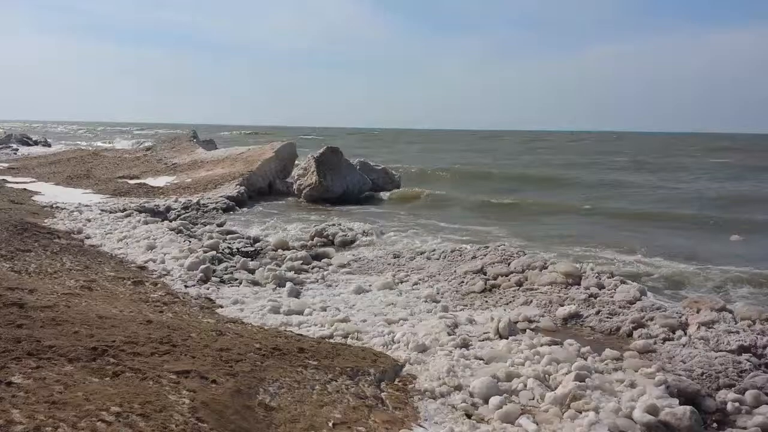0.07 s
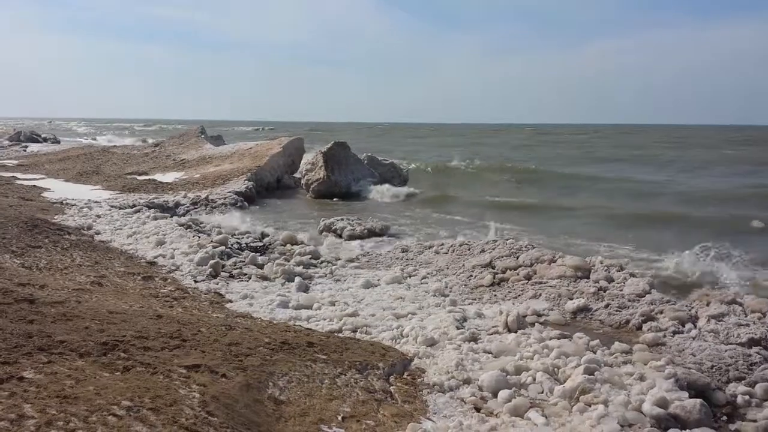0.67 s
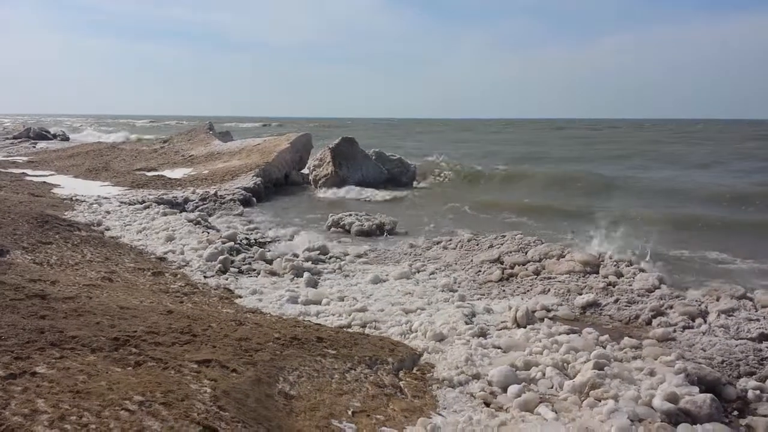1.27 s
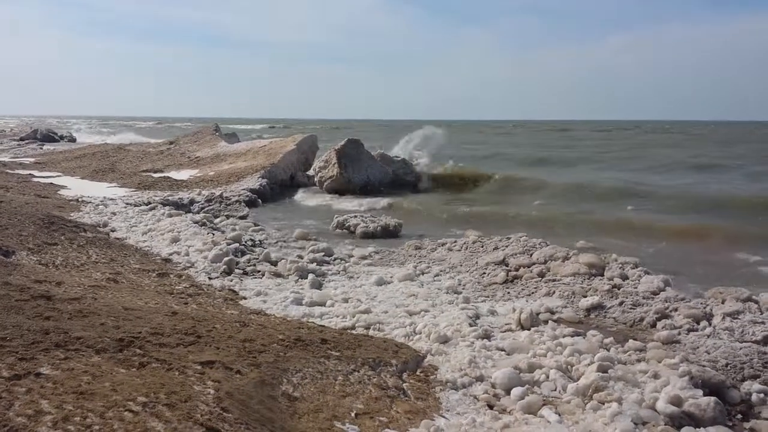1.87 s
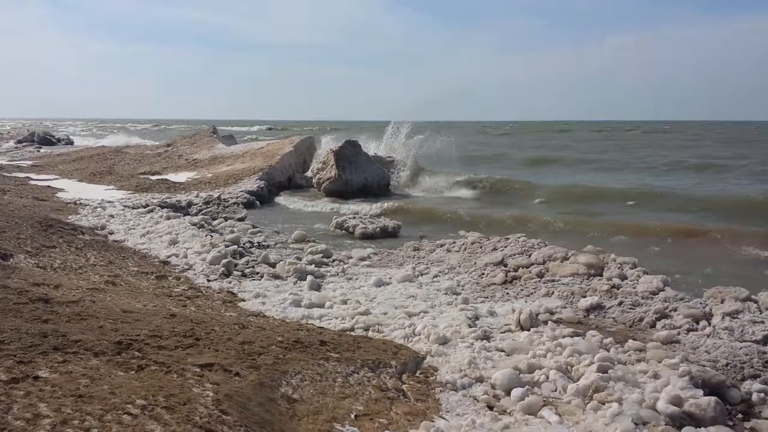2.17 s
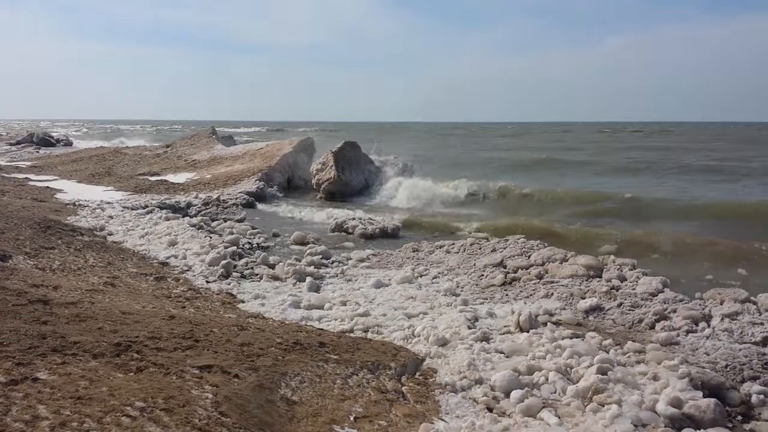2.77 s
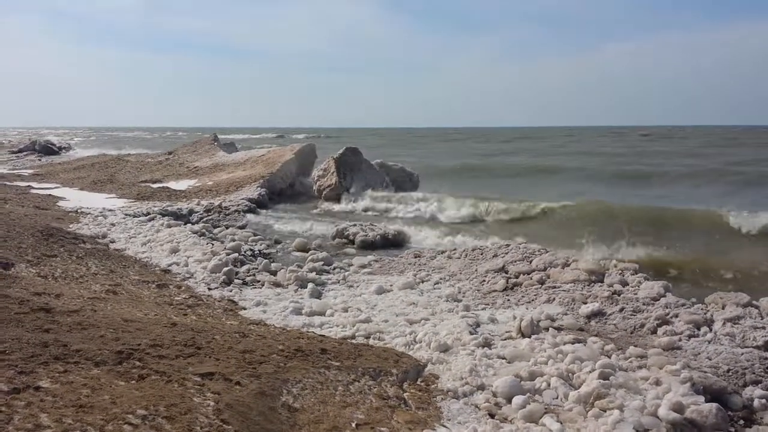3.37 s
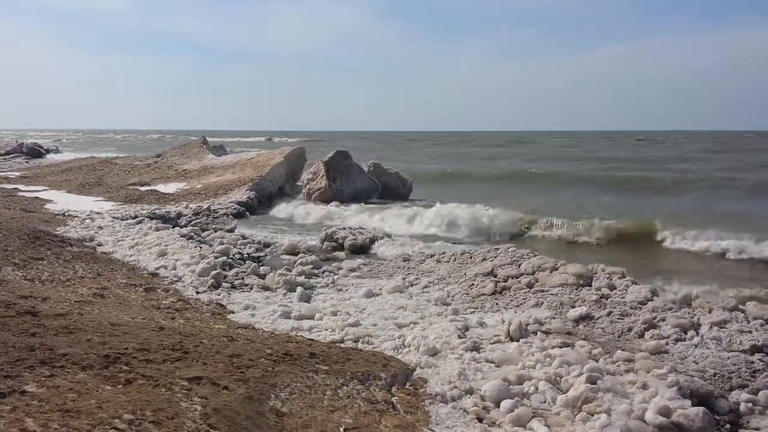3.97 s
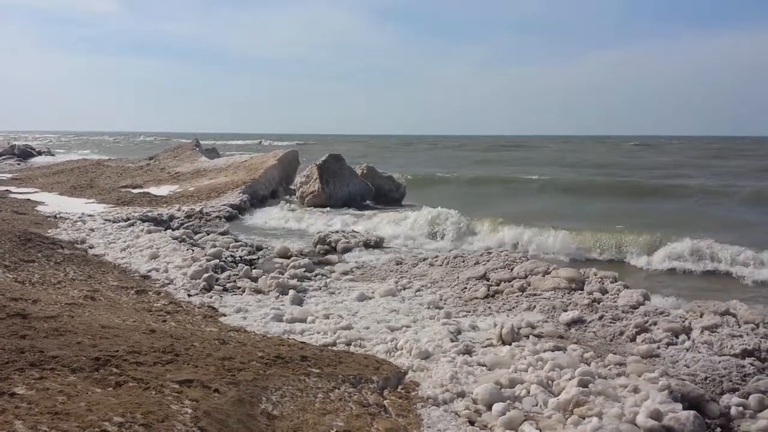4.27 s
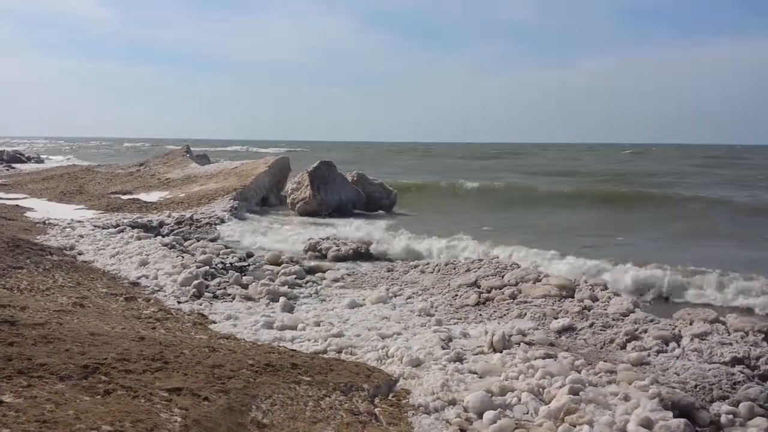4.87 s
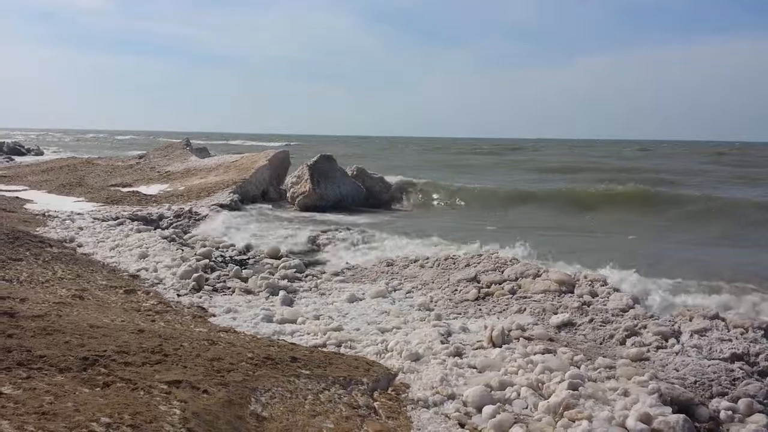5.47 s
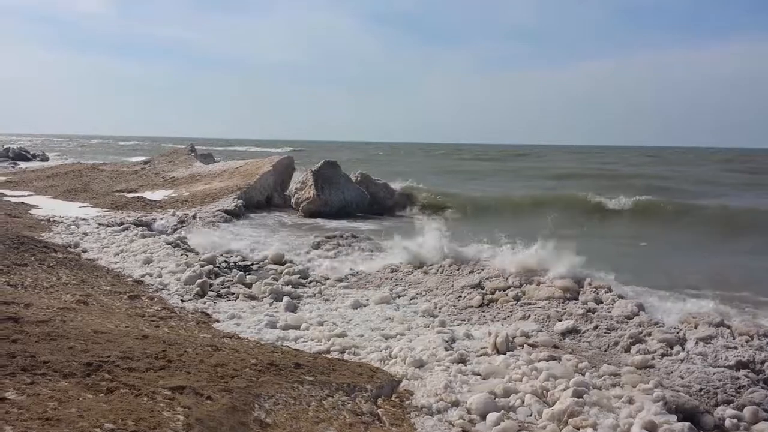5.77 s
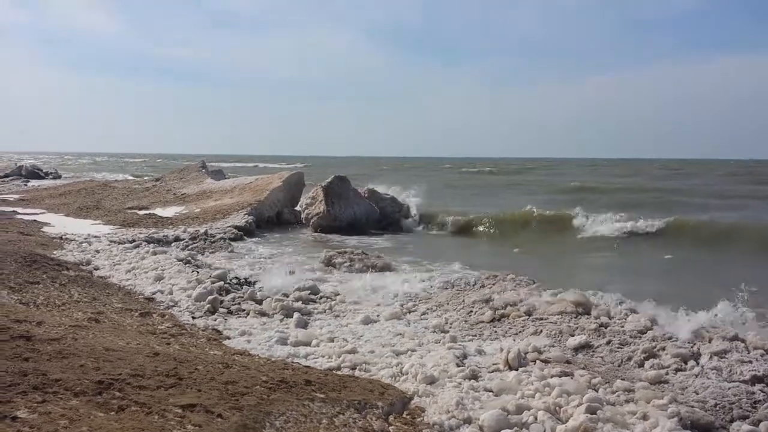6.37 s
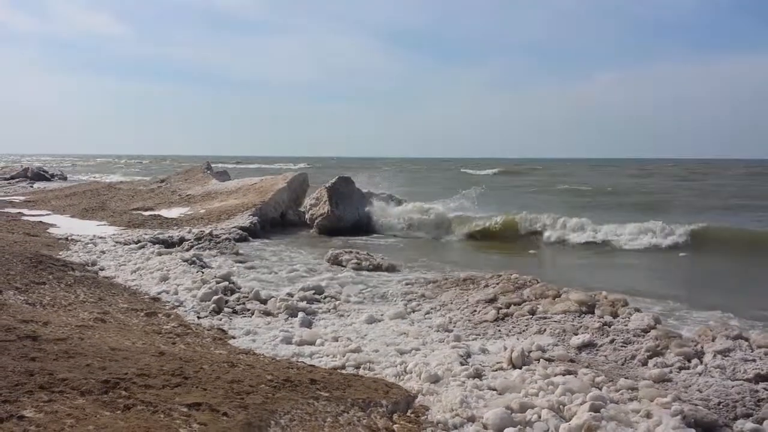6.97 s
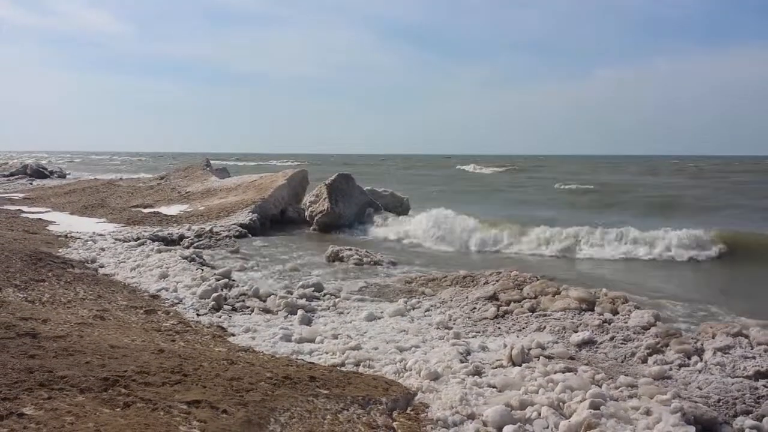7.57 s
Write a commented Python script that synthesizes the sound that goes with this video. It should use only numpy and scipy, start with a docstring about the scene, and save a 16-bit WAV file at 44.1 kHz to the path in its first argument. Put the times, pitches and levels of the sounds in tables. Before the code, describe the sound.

Outdoors by a lake, close wind rumbles unevenly against the microphone, breaking into short, rough gusts with crackles and thuds. Behind it, waves hiss softly on the icy shore, now and then splashing and dropping a fine spray. During a short lull, water gurgles between the ice lumps, before the wind picks up again and keeps buffeting to the end.

```python
"""Gusts on an icy lake shore

Wind buffets a camera's two microphone ports, each with its own rumble. Strong gusts tear into
short, brighter eddies, and some slap a port with a crack. Farther off, waves break, fizz and
gurgle over lumps of ice; gain control ducks them under the hardest gusts."""
import sys
import numpy as np
from scipy import signal
from scipy.fft import rfft, irfft
from scipy.io import wavfile
from scipy.ndimage import uniform_filter1d, minimum_filter1d

SR = 44100
rng = np.random.default_rng(int(sys.argv[2]) if len(sys.argv) > 2 else 0)


def output_pcm(signal):
    """Save a mono or channel-first signal as 16-bit PCM at the path in sys.argv[1].

    Samples are clipped to [-1, 1] before scaling.
    """
    pcm = np.clip(np.atleast_2d(signal).T, -1, 1) * 32767
    wavfile.write(sys.argv[1], SR, np.round(pcm).astype(np.int16))


N = 336483
TIME = np.arange(N) / SR
HZ = np.fft.rfftfreq(N, 1 / SR)

# Steady breeze on the left port: time_s, rumble_db
LEFT_BREEZE = [(0.4, -18), (1.7, -19.5), (2.15, -23.5), (2.6, -20.5), (3.6, -20.5), (3.92, -31),
               (4.5, -26.5), (4.75, -35.5), (5.05, -32.5), (5.4, -30.5), (6.75, -28), (7.6, -36)]
# Gusts that catch the left port: start_s, length_s, rumble_db, eddies_over_rumble_db
LEFT_GUSTS = [(0.386, 0.074, -21, 4.5), (0.636, 0.05, -20, -2), (0.77, 0.089, -14, -6.5),
              (0.94, 0.067, -14, -11), (1.16, 0.19, -20, -4.5), (1.376, 0.16, -15.5, -3.5),
              (1.555, 0.11, -21, 0.5), (1.753, 0.32, -17.5, -3.5), (2.176, 0.033, -12.5, -14),
              (2.276, 0.17, -15, -3.5), (2.435, 0.054, -14, 0), (2.49, 0.1, -20.5, 8),
              (2.611, 0.077, -11.5, -7.5), (2.727, 0.087, -19, 0.5), (2.931, 0.16, -10.5, -5.5),
              (3.122, 0.1, -14.5, 0.5), (3.276, 0.26, -23.5, 7.5), (3.578, 0.085, -23, 5.5),
              (3.679, 0.15, -17.5, 0.5), (3.94, 0.11, -22, -2.5), (4.041, 0.15, -17, 1.5),
              (4.214, 0.11, -20, -3.5), (4.417, 0.068, -16, -5), (5.087, 0.022, -13, -11),
              (5.132, 0.097, -27, 4), (5.248, 0.09, -19.5, 1.5), (5.45, 0.025, -27, -4),
              (5.528, 0.11, -16, -4), (5.679, 0.11, -11.5, -9), (5.794, 0.11, -16.5, -6),
              (5.995, 0.018, -13, -4.5), (6.028, 0.062, -14.5, -3), (6.11, 0.038, -23.5, 2),
              (6.235, 0.16, -19.5, -4), (6.421, 0.037, -14, -4), (6.488, 0.059, -15, -19),
              (6.574, 0.084, -21.5, -5), (6.824, 0.15, -17.5, -1), (6.977, 0.15, -16.5, 1),
              (7.181, 0.08, -12, -3.5), (7.302, 0.1, -21, 3.5), (7.413, 0.13, -16.5, -0.5),
              (7.543, 0.04, -17, 1.5)]
# Smoother flow on the right port: time_s, rumble_db, eddies_over_rumble_db
RIGHT_FLOW = [(0.4, -17, -8), (0.67, -22.5, 0), (0.78, -20, -9), (0.95, -21, -4), (1.3, -14.5, -6.5),
              (1.49, -13, -5), (1.56, -18.5, -4), (1.72, -17, -5), (1.9, -22, -6), (2.2, -25.5, -8),
              (2.48, -21, -6), (2.63, -14, -5), (2.83, -27.5, -5), (2.95, -21, -3), (3.13, -21.5, -13),
              (3.23, -16, 2.5), (3.34, -19, -1), (3.5, -21.5, 6), (3.9, -19, 0), (4.1, -21.5, 0.5),
              (4.3, -22, -2), (4.53, -21.5, -3), (4.62, -21.5, -0.5), (4.68, -19.5, -3), (4.77, -20.5, -1),
              (4.86, -20.5, -1), (5.02, -24.5, -7), (5.1, -25, -2), (5.19, -22.5, 0), (5.3, -24, -1.5),
              (5.5, -24.5, -3.5), (6.1, -25, -5), (6.36, -25, -2.5), (6.52, -29.5, 2.5), (6.78, -23, -6.5),
              (6.9, -18.5, 2.5), (7.08, -17, 1), (7.19, -14.5, 3), (7.28, -16.5, -1), (7.43, -17, 1.5),
              (7.6, -18, 0.5)]
# Tone of the wind right on the microphone: frequency_hz, gain_db
RUMBLE_SPECTRUM = [(15, -38), (30, -32), (55, -8.5), (120, -0.5), (200, -4), (300, -10.5), (450, -22),
                   (900, -35.5), (2000, -77)]
EDDY_SPECTRUM = [(40, -42), (130, 0), (280, 3), (450, -1), (700, -6.5), (1100, -14), (1600, -22.5),
                 (2400, -31), (3300, -37.5), (6000, -58), (14000, -86)]
# The size of the largest whirls lifts or thins the deepest rumble: time_s, gain_db
RUMBLE_DEPTH = [(.4, -4), (1, -3), (1.4, -8), (2.2, 0), (2.7, -3), (3.1, 2), (3.7, -6), (4.1, 0.5),
                (4.7, -3), (5.1, -4.5), (5.55, 6.5), (5.9, 1.5), (6.45, 5), (6.9, -2.5), (7.35, 0)]
# Level of the surf as heard behind the wind: it swells, and the level dips briefly at times: time_s, fizz_db,
# body_over_fizz_db
SURF_LEVEL = [(.6, -43, 2), (1.4, -44, 3), (2.05, -45.5, 6), (2.4, -42.5, 2), (2.85, -44, 3), (3.08, -41, 0.5),
              (3.35, -44, 5.5), (3.6, -44.5, 6.5), (3.95, -43, 2), (4.4, -42, 2.5), (4.62, -41.5, 3),
              (4.88, -41.5, 3), (5.15, -43, 3), (5.38, -40, 1.5), (5.52, -40.5, 4.5), (5.68, -39, 3),
              (5.82, -43.5, 4), (6.05, -44.5, 5), (6.2, -42.5, 3.5), (6.42, -44.3, 4.5), (6.6, -44, 4),
              (7.1, -42.5, 6), (7.6, -41, 4.5)]
# Bursts of hiss: waves bursting on the ice, and at 3.515 s wind hissing at the right port: start_s, fizz_db,
# left_minus_right_db
HISS_BURSTS = [(1.145, -45.5, 0), (2.345, -40.5, -1), (3.515, -47.5, -13), (4.57, -42, -3), (7.275, -44, 3)]
# Tone of the wash as it reaches each port: frequency_hz, gain_db
LEFT_WASH_SPECTRUM = [(700, 0), (1200, -6), (1700, -6), (2300, -4.5), (2900, -10), (3900, -8.5),
                      (4500, -5.5), (5050, -7.5), (5700, -1), (6400, 0), (7200, -6), (8200, -8.5),
                      (10000, -16), (12000, -17.5), (15000, -22)]
RIGHT_WASH_SPECTRUM = [(150, 6.5), (700, -2.5), (1200, -5), (1700, -4), (2300, -1), (2800, -10.5),
                       (3500, -13), (4450, -11), (5100, -13), (6300, -11.5), (7800, -11), (10000, -19),
                       (12000, -19.5), (15000, -24.5)]
# Foam running close to the microphone has more top treble: time_s, gain_db
FOAM_AIR = [(.6, -2), (2.4, -0.5), (3.3, -4), (4.2, -2.5), (5.4, 0), (6.6, 1), (7.6, 0.5)]
# Eddies striking a port; a short flip cracks, a long one thuds:
# time_s, level_db, left_minus_right_db, flip_s
SLAPS = [(.467, 0.5, 22, 0.000083), (.717, 3, 27, 0.00016), (0.753, -1.5, 20, 0.00016),
         (.779, -4.5, 20, 0.00018), (.802, -4, 20, 0.0002), (.849, 0.5, 25, 0.0002),
         (.878, -2.5, 18, 0.00018), (0.957, -8, 12, 0.00022), (1.214, 0.5, 22, 0.00037),
         (1.29, 3, 16, 0.00033), (1.338, -4.5, 19, 0.00016), (1.383, 3, 19, 0.00044),
         (1.497, -2, 26, 0.00011), (1.546, 4.5, 25, 0.0002), (1.879, -2.5, 20, 0.00027),
         (2.343, -4, 22, 0.00017), (2.449, -5, 22, .00011), (2.465, 0, 27, 0.00013),
         (2.499, 0.5, 23, 0.00014), (2.514, -2, 10, 0.0002), (2.528, 0, 20, 0.00018),
         (2.551, -13, 20, 0.00012), (2.57, 0, 16, 0.0001), (2.654, 0, 18, .0003),
         (2.681, -3.5, 18, 0.00014), (3.003, -2, 24, 0.000083), (3.067, -4, 24, 0.00014),
         (3.147, 0.5, 25, 0.00017), (3.158, -3.5, 22, 0.000087), (3.293, -6, -18, 0.00013),
         (3.311, 1, 26, 0.00016), (3.351, 2.5, 13, 0.00012), (3.425, -5, 18, 0.0001),
         (3.486, -4, -15, 0.00011), (3.574, -7, -21, 0.000099), (3.778, -2, -24, 0.00013),
         (3.792, -4.5, 12, 0.00024), (4.156, -2, 15, .00018), (4.446, -3, 16, .0004),
         (4.62, -8, -20, 0.00023), (4.766, -4, -24, 0.00021), (5.1, -4.5, 26, 0.00019),
         (5.294, -6, 8, 0.00023), (5.596, -9, 23, 0.00027), (5.707, 1, 20, 0.00042),
         (5.751, 0, 21, 0.00038), (5.805, -5, 24, 0.00011), (5.822, -1, 20, 0.00034),
         (6.01, -0.5, 20, 0.00028), (6.038, -6.5, 18, 0.00011), (6.056, -1, 20, 0.00045),
         (6.089, -2, 20, 0.00026), (6.336, -5.5, 16, .0002), (6.438, -2, 16, 0.00018),
         (6.512, -4, 17, 0.00058), (6.549, -5, 16, 0.00021), (6.92, -5, 17, 0.00013),
         (7.171, -2, -7, 0.0001), (7.229, -2, 15, 0.00049), (7.427, 0.5, 5, 0.00035),
         (7.502, -5, 11, .00018)]
# Tone of the rasp after a slap: frequency_hz, gain_db
RASP_SPECTRUM = [(40, -7), (150, 16.5), (500, 16.5), (1000, 3), (1600, -5.5), (2400, -12), (3500, -23),
                 (7000, -23), (14000, -62)]
# Thumps, hollow flutters and rushing notes on the left port: start_s, length_s, pitch_hz, level_db
VORTICES = [(1.41, 0.11, 395, -13.5), (2.43, 0.28, 169, -12.5), (2.444, 0.11, 1050, -21.5),
            (2.824, 0.024, 142, -9.5), (2.945, .15, 75.4, -14.5), (4.038, .16, 81, -13.5),
            (5.992, 0.14, 139, -11.5), (6.965, .13, 344, -19.5)]
# Spray raining back on the ice: start_s, length_s, level_db
SHOWERS = [(1.55, 0.63, -46.5), (2.1, 0.94, -42.5), (2.29, 0.17, -44), (5.786, 0.28, -44), (6.1, 0.13, -42),
           (6.3, .22, -43)]
# Sizzle of that spray: frequency_hz, gain_db
SIZZLE_SPECTRUM = [(1500, -25), (2400, -21), (3200, -27), (5200, -9), (6200, 10), (6800, 3), (8000, -22),
                   (14000, -35)]
# Broken waves running up over the lumps of ice: time_s, level_db, gurgle_hz
SURGE = [(2.6, -62, 2300), (2.83, -44, 2360), (3.1, -60, 2350), (4.1, -56, 2200), (4.62, -45, 2220),
         (5.0, -48, 2220), (5.35, -42.5, 2300), (5.65, -41, 2200), (5.95, -43, 2150), (6.5, -49, 2260),
         (7.0, -56, 2280)]


def from_db(db):
    return 10 ** (np.asarray(db) / 20)


def unit(x):
    """Scales to rms 1."""
    return x / np.sqrt(np.mean(x ** 2) + 1e-20)


def follow(rows):
    """The columns of a timed table at every sample."""
    times, *columns = np.transpose(rows)
    return [np.interp(TIME, times, column) for column in columns]


def colour(x, spectrum):
    """Filters by a spectrum, keeping the power of white noise."""
    hz, db = np.transpose(spectrum)
    gain = from_db(np.interp(np.log(HZ + 1), np.log(hz), db))
    return irfft(rfft(x) * unit(gain), N)


def low_pass(x, hz):
    """Keeps what lies under hz, without delay."""
    return irfft(rfft(x) / (1 + (HZ / hz) ** 4), N)


def resonate(x, hz, width_hz):
    """Two resonances in series, each width_hz wide, that follow hz."""
    turn = np.exp(2j * np.pi * np.cumsum(hz * np.ones(N)) / SR)
    r = np.exp(-np.pi * width_hz / SR)
    return unit((turn * signal.lfilter([(1 - r) ** 2], [1, -2 * r, r * r], x / turn)).real)


def drift(slow_hz, fast_hz):
    """Random wandering between two rates, rms 1, without extreme swings."""
    band = HZ / (HZ + slow_hz) / (1 + (HZ / fast_hz) ** 2)
    wander = unit(irfft(rfft(rng.standard_normal(N)) * band, N))
    return unit(np.tanh(wander / 2))


def arch(start_s, length_s):
    """Swells and dies in half a sine."""
    return np.sin(np.pi * np.clip((TIME - start_s) / length_s, 0, 1))


def gusts(attack_s=0.011, release_s=0.04, arch_db=2.5):
    """Gusts jump out of the breeze on the left port and drop away: rumble_db, eddies_over_rumble_db."""
    breeze_db, = follow(LEFT_BREEZE)
    rumble_power = from_db(breeze_db) ** 2
    # eddies grow faster than the rumble, both in the breeze and within a gust
    eddy_power = from_db(-21.5 + 2.15 * (breeze_db + 20)) ** 2
    for start, length, db, eddy_db in LEFT_GUSTS:
        during = (TIME > start) & (TIME < start + length + 10 * release_s)
        t = TIME[during] - start
        swell = from_db(-arch_db * np.minimum(2 * t / length - 1, 1) ** 2)  # strongest at its middle
        gust = swell * np.minimum(t / attack_s, 1) * np.exp(-np.maximum(t - length, 0) / release_s)
        rumble_power[during] += (from_db(db) * gust) ** 2
        eddy_power[during] += (from_db(db + eddy_db) * gust ** 1.21) ** 2
    return 10 * np.log10(rumble_power), 10 * np.log10(eddy_power / rumble_power)


def wind(flow, rumble_db, eddy_db, throb_db, tear_db, shred):
    """Air pressure right on one port: a lumpy rumble, and eddies that come in quick bursts."""
    level_db, bright_db = flow
    turbulence = drift(slow_hz=38, fast_hz=52.7)
    rumble = colour(rng.standard_normal(N), RUMBLE_SPECTRUM) * unit(from_db(throb_db * turbulence))
    rumble += (from_db(follow(RUMBLE_DEPTH)[0]) - 1) * low_pass(rumble, hz=96.5)
    # small eddies are more intermittent than large ones, so their level swings further
    bursts = unit(from_db(tear_db * turbulence + 1.85 * drift(slow_hz=39.8, fast_hz=328)))
    eddies = colour(rng.standard_normal(N) * bursts, EDDY_SPECTRUM)
    # the faster the air, the more of it shreds into fine crackle
    coarse = low_pass(eddies, hz=780)
    crackle = unit(from_db(4.3 * drift(slow_hz=80, fast_hz=394)))
    fine = (eddies - coarse) * crackle * from_db(shred * (level_db + bright_db + 18.5))
    eddies = from_db(eddy_db + bright_db) * (coarse + fine)
    return from_db(level_db) * (from_db(rumble_db) * rumble + eddies)


def surf(side, rise_s=0.031, fall_s=0.16):
    """The surf's level and its bursts of hiss, left (side 1) or right (-1): fizz_db, body_over_fizz_db."""
    swell_db, body_db = follow(SURF_LEVEL)
    power = from_db(swell_db) ** 2
    for start, db, pan_db in HISS_BURSTS:
        t = TIME - start
        burst = np.clip(t / rise_s, 0, 1) * np.exp(-np.maximum(t - rise_s, 0) / fall_s)
        power += (from_db(db + side * pan_db / 2) * burst) ** 2
    return 10 * np.log10(power), body_db


def droplets(per_s, spread_db, decay_cycles):
    """Spray falling on ice and water: short pings of many pitches and sizes."""
    t, out = np.arange(512) / SR, np.zeros(N)
    pitches = np.geomspace(1400, 12000, num=20)
    for hz in pitches:
        hits = np.flatnonzero(rng.random(N) < per_s / len(pitches) / SR)
        sizes = from_db(spread_db * np.minimum(rng.exponential(1, N)[hits], 3))
        ping = unit(np.sin(2 * np.pi * hz * t) * t * np.exp(-t * hz / decay_cycles)) * np.sqrt(hz)
        at = hits[:, None] + np.arange(len(t))
        out += np.bincount(at.ravel(), np.outer(sizes, ping).ravel(), N)[:N]
    return unit(out)


def wash(swell, spectrum, churn_db, gain_db, spray_db, body_hz):
    """Waves behind the wind at one port: hissing foam and droplets over the breakers' duller body."""
    fizz_db, body_db = swell
    foam = rng.standard_normal(N)
    spray = from_db(spray_db) * droplets(per_s=1400, spread_db=-5, decay_cycles=2.5)
    water = colour(unit(foam + spray), spectrum)
    body = low_pass(water, body_hz)
    air = water - low_pass(water, hz=8500)
    fizz = water - body - air
    waves = from_db(body_db) * body + fizz + from_db(follow(FOAM_AIR)[0]) * air
    return from_db(gain_db + fizz_db + churn_db) * waves


def slaps(push_s, rasp_db, rasp_s):
    """Single eddies hit a port: pressure builds, flips to suction with a crack, then rasps briefly."""
    t = np.arange(-512, 2048) / SR
    pushes, rasps = np.zeros((2, N)), np.zeros((2, N))
    after = np.maximum(t, 0) / rasp_s
    for time_s, db, pan_db, flip_s in SLAPS:
        ports = from_db(db + np.minimum([pan_db, -pan_db], 0))
        at = np.round(t * SR).astype(int) + round(time_s * SR)
        pushes[:, at] -= np.outer(ports, np.tanh(t / flip_s) * np.exp(-abs(t) / push_s))
        rasps[:, at] += np.outer(ports, after * np.exp(1 - after))
    return pushes + from_db(rasp_db) * rasps * colour(rng.standard_normal(N), RASP_SPECTRUM)


def vortices():
    """Air sheds whirls at the port at a nearly even rate: a narrow, wavering band of pressure."""
    out = np.zeros(N)
    for start, length, hz, db in VORTICES:
        whirls = resonate(rng.standard_normal(N), hz, width_hz=0.46 * hz)
        out += from_db(db) * arch(start, length) * unit(np.tanh(whirls))
    return out


def showers(spray_db, right_db):
    """Water thrown up by a wave patters down on the ice, mostly left of the microphone."""
    power = sum((from_db(db) * arch(start, length)) ** 2 for start, length, db in SHOWERS)
    ports = []
    for port_db in (0, right_db):
        hiss = rng.standard_normal(N)
        spray = from_db(spray_db) * droplets(per_s=1100, spread_db=-2.5, decay_cycles=2.6)
        ports.append(from_db(port_db) * unit(colour(hiss + spray, SIZZLE_SPECTRUM)))
    return np.sqrt(power) * np.array(ports)


def surge(bubbles_db, width_hz, left_db, slosh_db):
    """Water gurgles between the lumps of ice ahead: one sound in both ports, softer on the left."""
    level_db, gurgle_hz = follow(SURGE)
    rush = rng.standard_normal(N)
    bubbles = from_db(bubbles_db) * droplets(per_s=900, spread_db=2.5, decay_cycles=5)
    slosh = unit(from_db(slosh_db * drift(slow_hz=6, fast_hz=25)))
    gurgle = resonate(rush + bubbles, gurgle_hz, width_hz)
    return from_db([[left_db], [0]]) * from_db(level_db) * slosh * gurgle


def scene():
    """From the shore: wind and slaps right on the ports, the waves and their spray beyond."""
    churn_db = 0.78 * drift(slow_hz=2.2, fast_hz=24.8)  # the foam surges alike at both ports
    left = wind(gusts(), rumble_db=1, eddy_db=1.18, throb_db=4, tear_db=1.77, shred=0.87) + vortices()
    right = wind(follow(RIGHT_FLOW), rumble_db=0.5, eddy_db=0, throb_db=1.5, tear_db=2, shred=0.51)
    left += wash(surf(1), LEFT_WASH_SPECTRUM, churn_db, gain_db=5.5, spray_db=-13.5, body_hz=3000)
    right += wash(surf(-1), RIGHT_WASH_SPECTRUM, churn_db, gain_db=7.5, spray_db=-8.5, body_hz=2980)
    cracks = slaps(push_s=0.0011, rasp_db=-14, rasp_s=0.0034)
    patter = showers(spray_db=-8, right_db=-11)
    gurgle = surge(bubbles_db=1, width_hz=510, left_db=-9, slosh_db=1.5)
    return np.array([left, right]) + cracks + patter + gurgle


def hold(over_db, recover_db_per_s):
    """Catches each overshoot and lets it fall back at a steady rate."""
    fall_db = TIME * recover_db_per_s
    return np.maximum.accumulate(np.maximum(over_db, 0) + fall_db) - fall_db


def gain_control(x, threshold_db, share, window_s, recover_db_per_s):
    """Turns both channels down by a share of the louder one's level over the threshold, then recovers."""
    power = uniform_filter1d(x ** 2, size=round(window_s * SR), axis=1).max(0)
    held_db = hold(10 * np.log10(abs(power) + 1e-12) - threshold_db, recover_db_per_s)
    return x / from_db(share * uniform_filter1d(held_db, size=441))


def limiter(x, ceiling_db, recover_db_per_s):
    """Peaks over the ceiling turn both channels down at once; the gain then creeps back."""
    held_db = hold(20 * np.log10(abs(x).max(0) + 1e-9) - ceiling_db, recover_db_per_s)
    widened_db = -minimum_filter1d(-held_db, size=61)
    return x / from_db(uniform_filter1d(widened_db, size=61))


def record(dry):
    """The camera cuts the deepest rumble, fades in, holds down the peaks and cuts the top treble."""
    thinned = dry - low_pass(dry, hz=32)
    rounded = thinned / (1 + (thinned / 1.25) ** 4) ** .25  # the microphone rounds the hardest peaks
    faded = rounded * np.interp(TIME, [.387, .47, .64], [.07, .27, 1], left=0)
    ducked = gain_control(faded, threshold_db=-9, share=0.92, window_s=0.0073, recover_db_per_s=66)
    limited = limiter(ducked, ceiling_db=-.6, recover_db_per_s=70)
    treble_cut = signal.firwin(601, cutoff=15150, window=("kaiser", 9), fs=SR)
    return signal.oaconvolve(limited, treble_cut[None], "same")


dry = scene()
out = record(dry)
output_pcm(out)
```